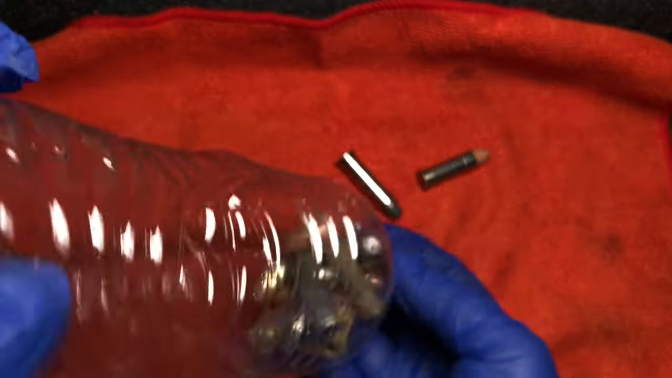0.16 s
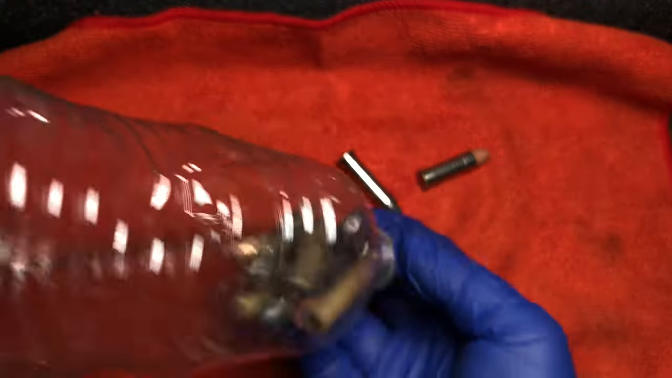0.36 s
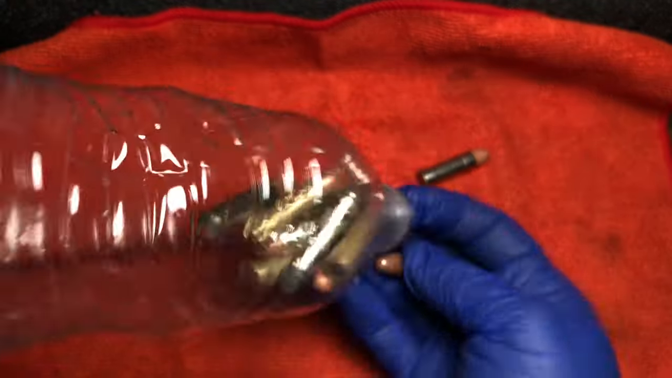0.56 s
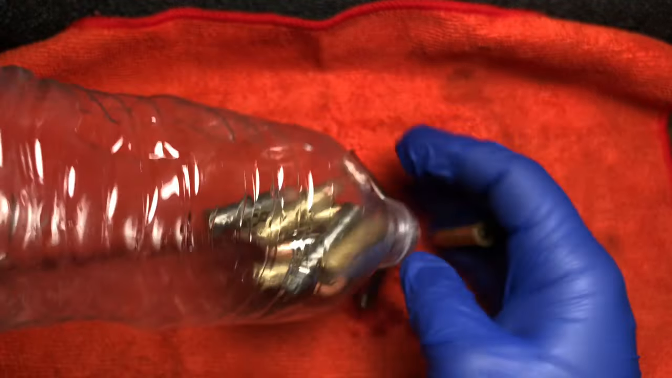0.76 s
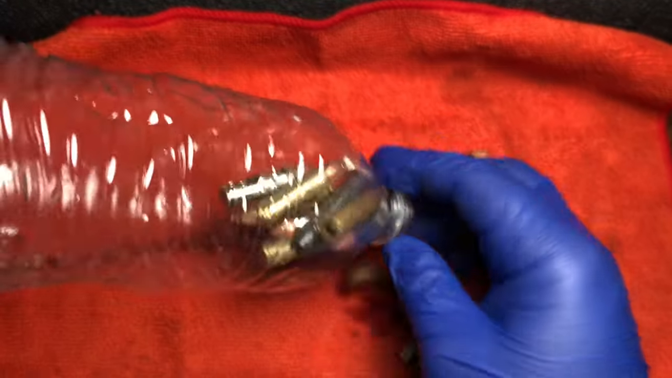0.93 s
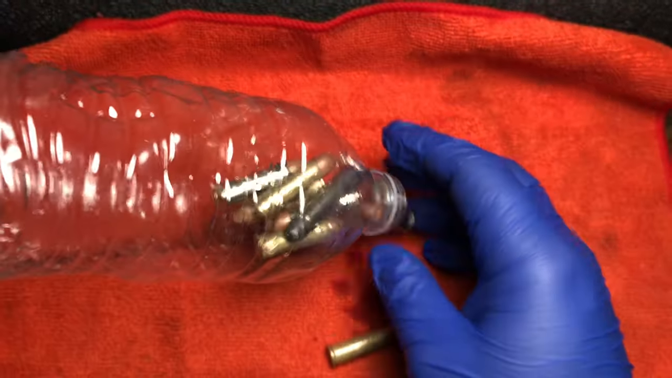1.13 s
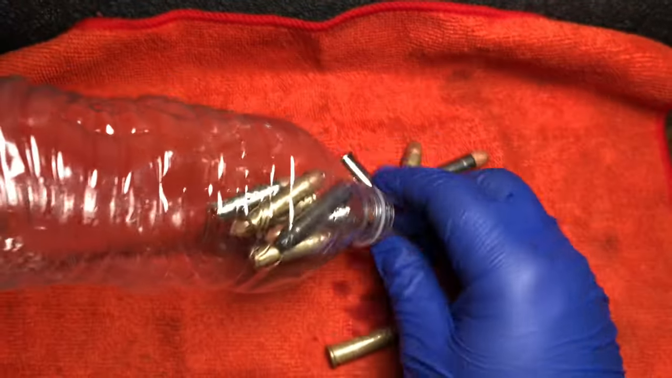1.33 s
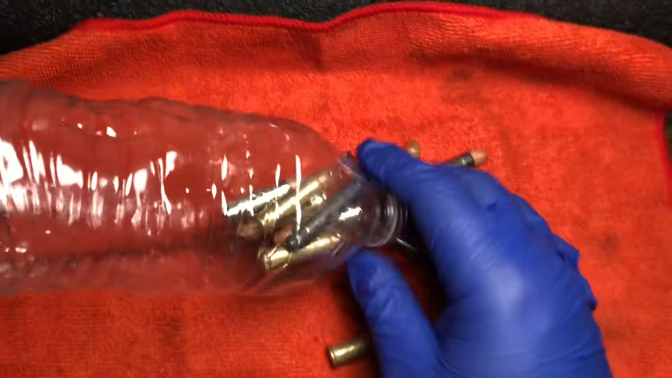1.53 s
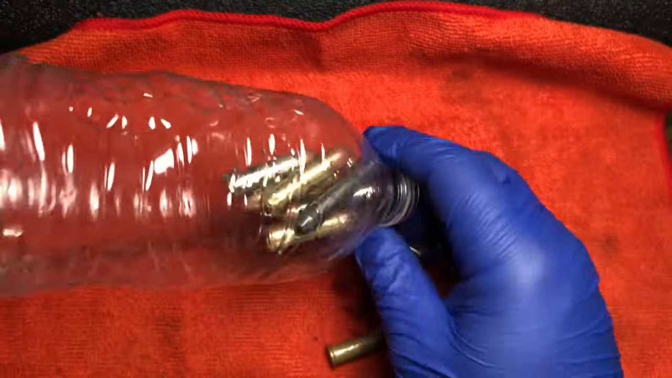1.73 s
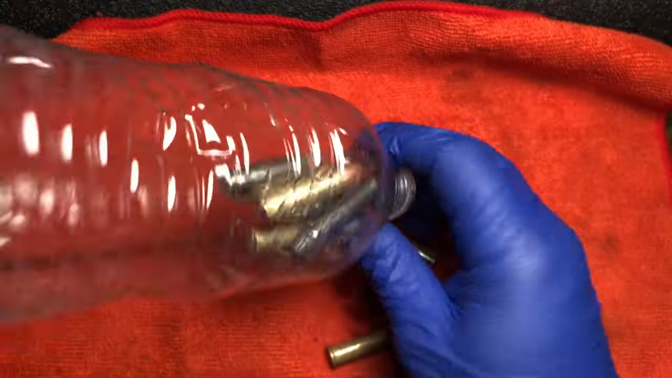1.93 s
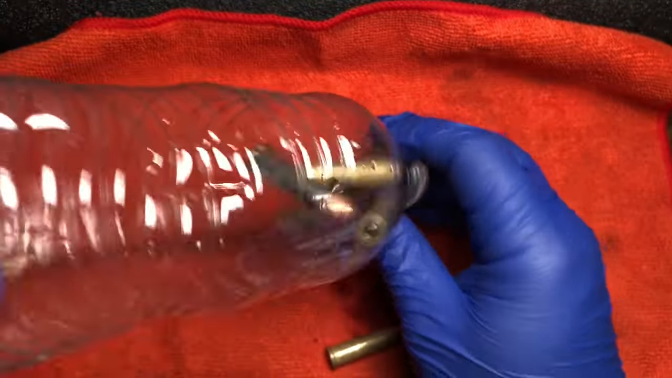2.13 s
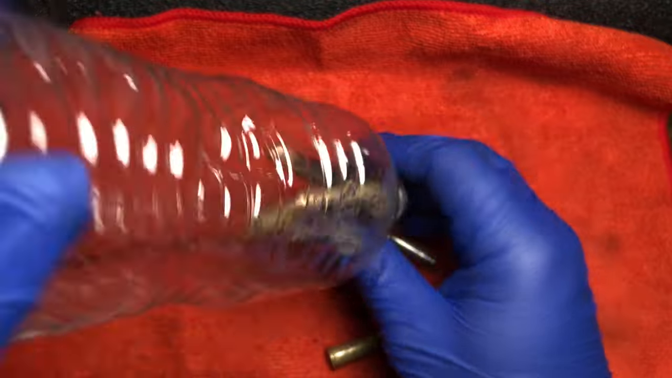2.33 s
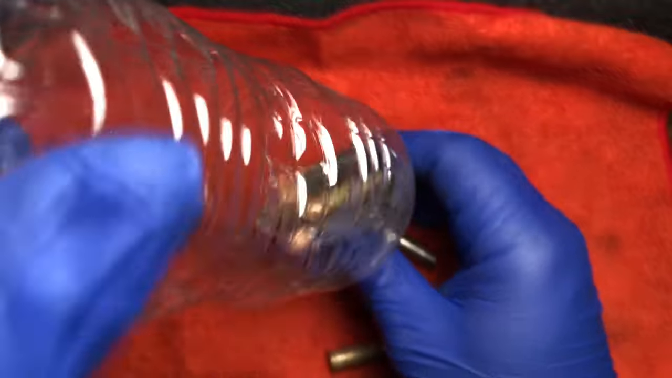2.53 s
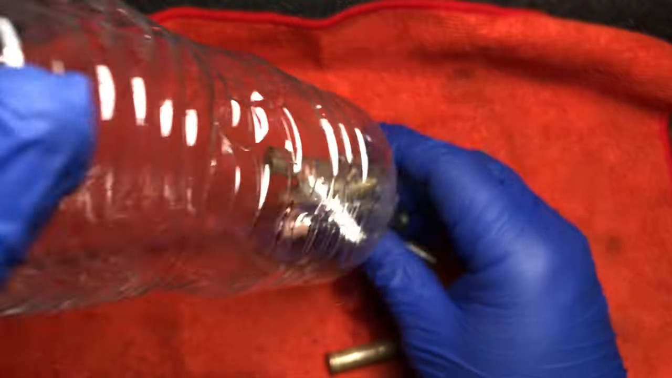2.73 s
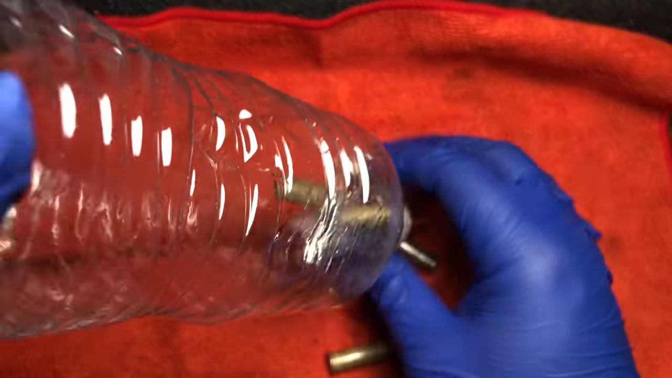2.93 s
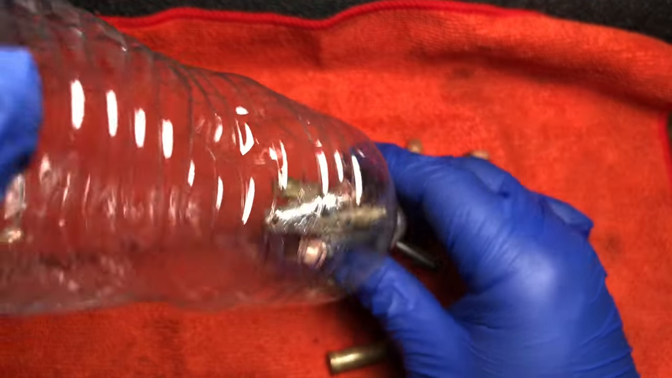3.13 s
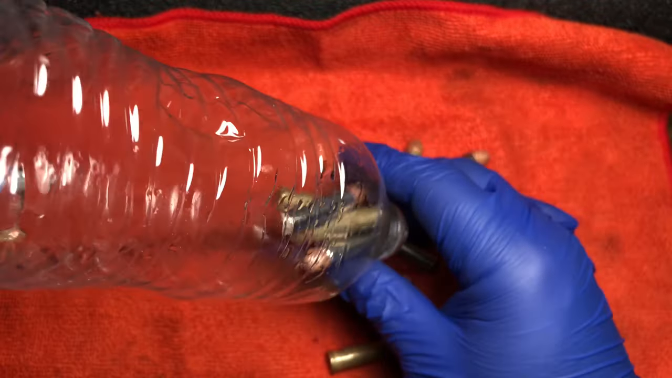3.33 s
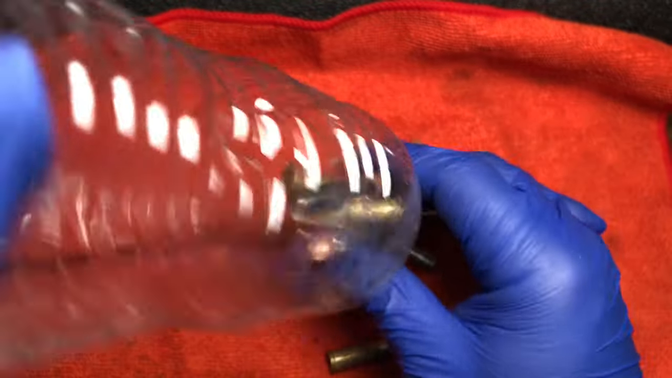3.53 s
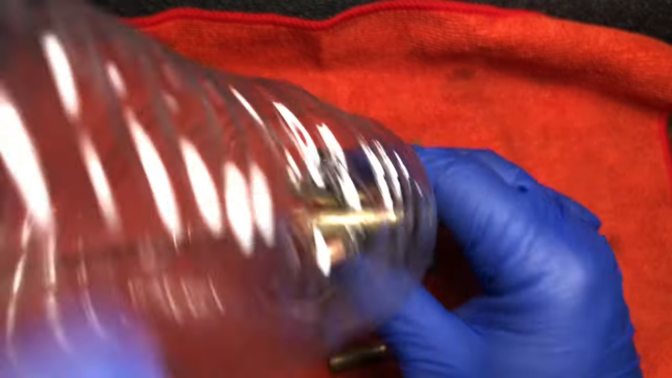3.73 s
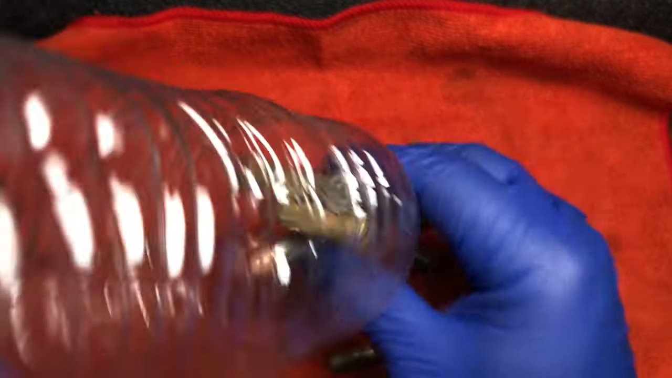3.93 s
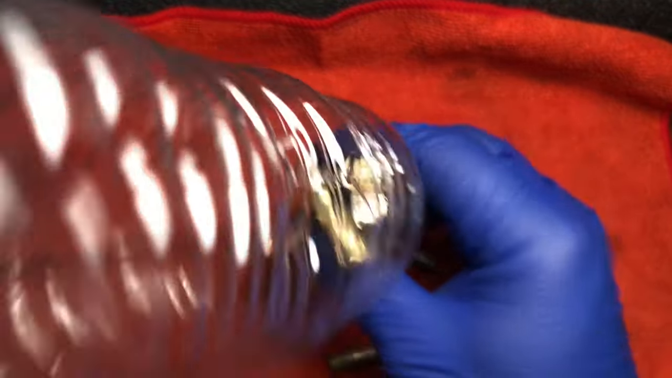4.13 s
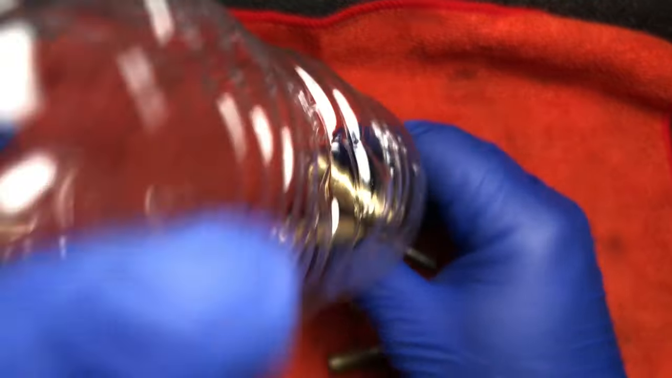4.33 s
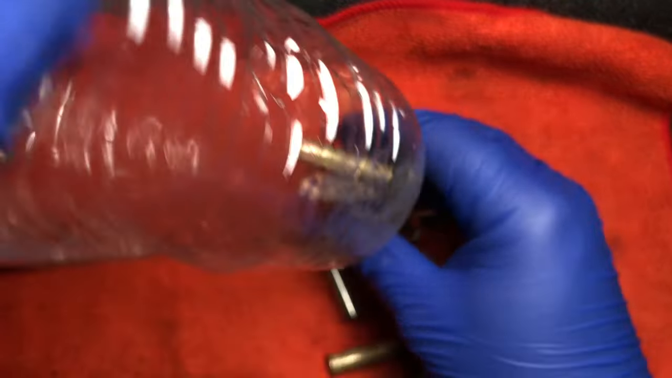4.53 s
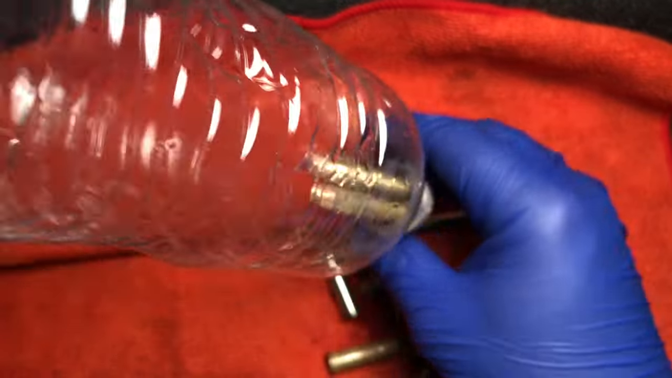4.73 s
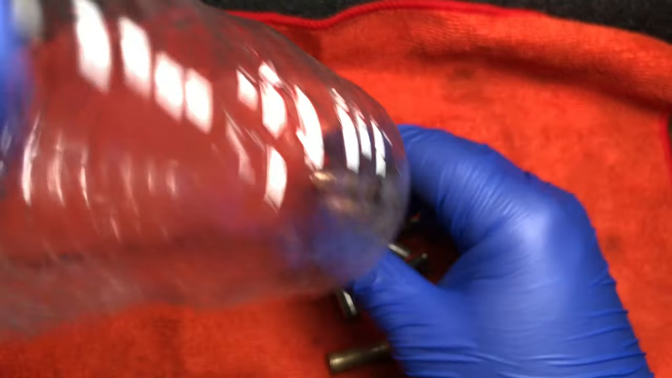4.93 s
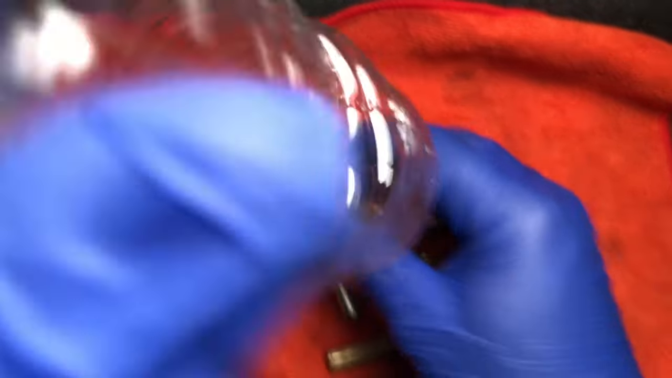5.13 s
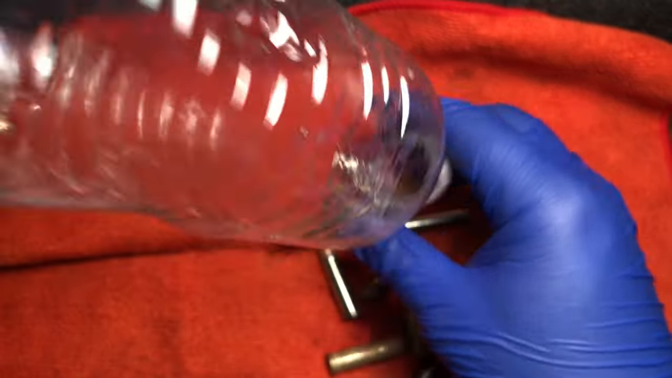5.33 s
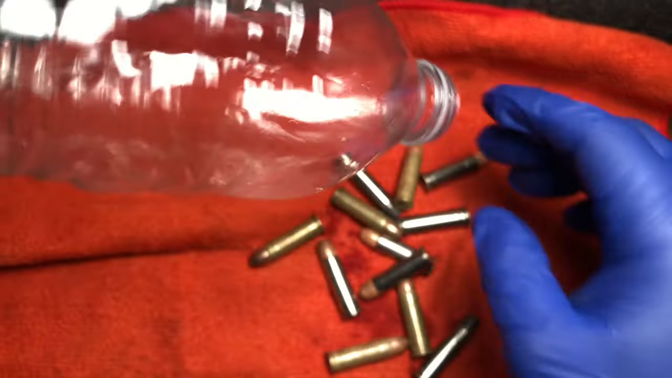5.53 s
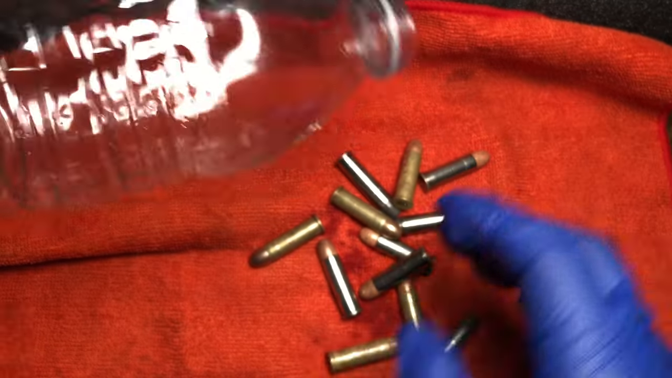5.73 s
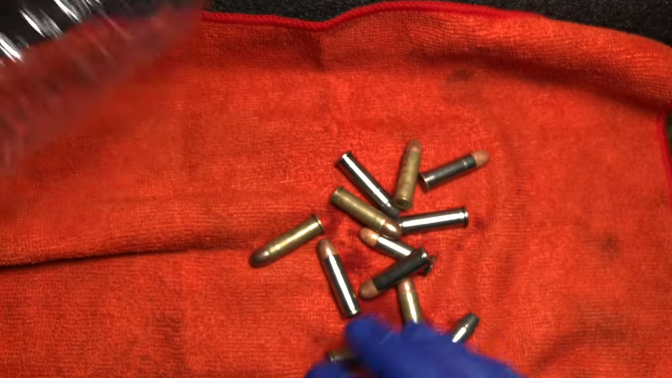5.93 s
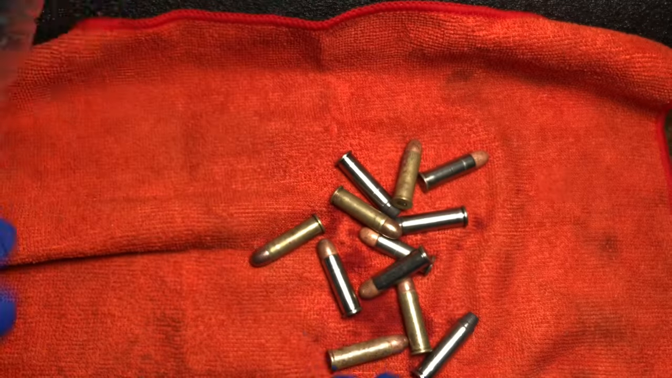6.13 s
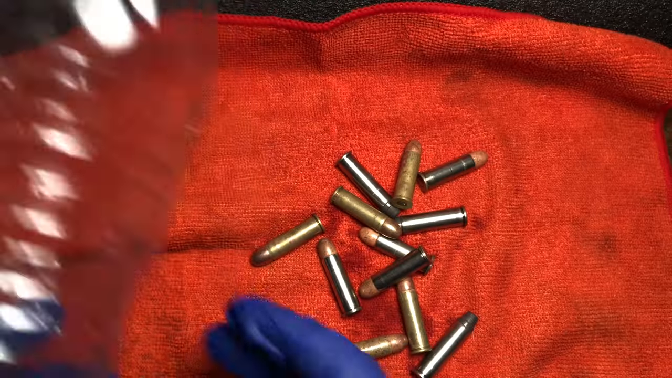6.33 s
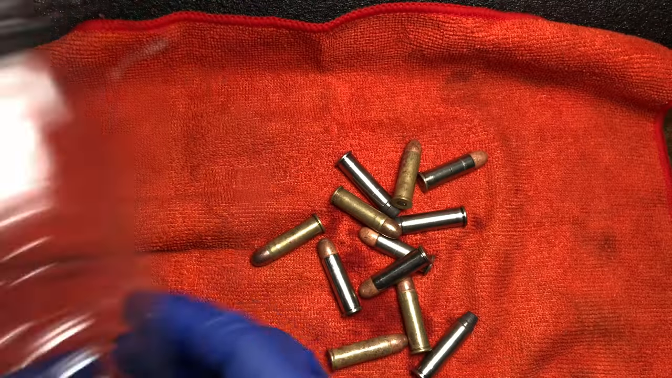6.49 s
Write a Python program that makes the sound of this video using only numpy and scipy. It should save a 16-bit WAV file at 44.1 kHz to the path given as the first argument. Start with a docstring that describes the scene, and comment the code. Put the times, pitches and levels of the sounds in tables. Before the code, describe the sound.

Metal cartridges rattle and clink inside a thin plastic bottle being shaken, with faint glove rustles over a low hum.

```python
"""Over a low appliance hum, loaded brass cartridges clatter in a thin plastic bottle that gloved hands
shake and tip above a cloth-covered table. Each impact cracks and excites the damped modes of the wall
and the hollow body; then the pile rebounds and slides. Colliding cases clink, one high note each.
A small room reverberates, and the gloves rustle by friction on plastic and cloth."""
import sys
import numpy as np
from scipy import signal
from scipy.fft import rfft, irfft
from scipy.io import wavfile
from scipy.ndimage import uniform_filter1d

SR = 44100
rng = np.random.default_rng(int(sys.argv[2]) if len(sys.argv) > 2 else 0)


def unload_wav(signal):
    """Save mono or channel-first audio to the path in sys.argv[1] as 16-bit WAV at rate SR, clipped to [-1, 1]."""
    wavfile.write(
        sys.argv[1],
        SR,
        np.round(np.clip(np.atleast_2d(signal).T, -1, 1) * 32767).astype(np.int16),
    )


N = 289296

# ring mode of each case, lowest first: (frequency [Hz])
CASE_MODES_HZ = [9855, 10090, 10300, 10395, 11070, 11290, 11385, 11770, 11850, 11930]
# decay of each case's mode: (t60 [s])
CASE_DECAYS_S = [0.11, 0.07, 0.055, 0.12, 0.06, .06, 0.07, .05, .055, 0.065]
# when each case drops out of the bottle: (time [s])
CASE_EXITS_S = [1.4, 2.7, 3.2, 2.7, 4.7, 4.7, 4.9, 4.5, 4.5, 4.9]


def undb(db):
    return 10 ** (np.asarray(db) / 20)


def fade(t, t60):
    """Exponential decay, 60 dB down at t60."""
    return np.exp(-np.log(1000) * t / np.maximum(t60, .003))


def colour(x, points):
    """Spectral shaping of the last axis by (frequency [Hz], gain [dB]) points."""
    hz, db = np.transpose(points)
    n = x.shape[-1]
    f = np.maximum(np.arange(n // 2 + 1) * SR / n, 1)
    return irfft(rfft(x) * undb(np.interp(np.log(f), np.log(hz), db)), n)


def place(times, sounds):
    """Superposition of short sounds, each at its time."""
    out = np.zeros(N + sounds.shape[1])
    for s, sound in zip(times, sounds):
        i = int(np.clip(s * SR, 0, N - 1))
        out[i:i + len(sound)] += sound
    return out[:N]


def peak_one(x):
    return x / np.abs(x).max(axis=1, keepdims=True)


def held_noise(samples):
    return np.repeat(rng.standard_normal(N // samples + 1), samples)[:N]


def isolation(times, crowd_s):
    """Near 0 when the next blow follows at once, near 1 when it is far off."""
    ordered = np.append(np.sort(times), N / SR)
    gap = ordered[np.searchsorted(ordered, times, side="right")] - times
    return 1 - np.exp(-(gap / crowd_s) ** 2)


def hum(level_db=-44.5, flicker_db=0.2):
    """Coloured noise: appliance drone and microphone hiss under slight amplitude modulation."""
    # noise spectrum: (frequency [Hz], relative density [dB])
    spectrum = [(18, -73.5), (30, -41), (42, -19.5), (118, -6), (145, -3.5), (233, -5), (266, -16.5),
                (303, -2.5), (328, -17.5), (461, -7.5), (569, -21.5), (684, -16.5), (1010, -27),
                (3870, -45), (16000, -52.5)]
    drone = colour(rng.standard_normal(N), spectrum)
    waver = uniform_filter1d(held_noise(SR // 8), SR // 8)
    return drone / drone.std() * undb(level_db + flicker_db * waver)


def tumble(count=6, fall_db=-6, body_db=-6, crack_db=-3, scatter_db=4.5):
    """Dissipation: random taps weaken as the pile settles. Returns rows of blows for knocks()."""
    # spells of tumbling: (start [s], length [s], opening wall level [dB])
    spells = [(0.0, 0.079, -20.5), (.13, 0.068, -31), (.3, 0.11, -20), (.47, .11, -16.5), (.62, .11, -33),
              (.81, 0.18, -19), (1.08, 0.11, -30.5), (1.19, 0.12, -28.5), (1.54, 0.1, -43),
              (2.05, .08, -37), (2.23, .1, -29), (2.33, 0.12, -13.5), (2.6, 0.049, -39),
              (2.76, 0.058, -19.5), (2.87, 0.067, -26.5), (3.08, 0.078, -31), (3.67, 0.072, -40.5),
              (3.88, 0.052, -13.5), (4.08, .14, -28), (4.29, 0.13, -21), (4.41, 0.18, -31),
              (4.56, 0.097, -31), (4.67, 0.043, -44), (4.94, .11, -33), (5.1, 0.099, -26.5)]
    start, length, opening_db = np.repeat(spells, count, axis=0).T
    progress = (np.tile(np.arange(count), len(spells)) + rng.random(len(start))) / count
    scatter = scatter_db * rng.standard_normal((len(start), 3))
    wall_db = opening_db + fall_db * progress
    levels = wall_db[:, None] + [0, body_db, crack_db] + scatter
    return np.column_stack([start + length * progress, levels])


def bottle_ring(modes, count, size, rise_cycles, scatter_db, detune=0.033, octave_db=0):
    """Modal superposition: the point of impact sets each mode's share; low modes build up later."""
    hz, db, t60 = np.transpose(modes)
    t = np.arange(size) / SR
    partials = []
    for shift in (-1.71, -1.43, 0.0069, 0.67, 1.68):  # the squeezed bottle spreads every mode
        f = (hz * (1 + shift * detune))[:, None]
        rise = 1 - np.exp(-t * f / rise_cycles)
        partials.append(np.sin(2 * np.pi * f * t) * fade(t, t60[:, None]) * rise)
    chance = rng.standard_normal((count, 2, 5 * len(hz)))
    octaves = np.tile(np.log2(hz / hz[0]), 5)
    share_db = np.tile(db, 5) + octave_db * octaves + scatter_db * chance[:, 1]
    share = np.sign(chance[:, 0]) * undb(share_db)
    return peak_one(share @ np.concatenate(partials))


def knocks(times, wall_db, body_db, crack_db, crack_tilt=0.5, wall_tilt=0.16, bump_db=4.0):
    """Impact excitation: a crack, wall and body modes, jingling cases. Longer contact gives less treble."""
    # contact noise: (frequency [Hz], gain [dB])
    crack_spectrum = [(1400, -9.5), (2200, -5.5), (3200, 4.5), (4400, -2.5), (5300, -2.5), (7000, -7.5),
                      (9500, -13.5), (13000, -16), (16000, -30.5)]
    # modes of the plastic wall: (frequency [Hz], relative level [dB], t60 [s])
    wall_modes = [(618.5, -0.5, .04), (708.5, -3, 0.031), (907, -2, 0.051), (959, -11, 0.029),
                  (1075, -0.5, 0.038), (1203.6, 0.5, 0.043), (1349, -4, 0.046), (1466, -4, 0.034),
                  (1632, -3.5, 0.027), (1947, -5.5, 0.026), (2117, -5.5, 0.028), (2660, -6, 0.026),
                  (2970, -6, 0.016)]
    # modes of the hollow body: (frequency [Hz], relative level [dB], t60 [s])
    body_modes = [(157.9, -4.5, 0.057), (220.7, -5, 0.07), (253.5, -2.5, 0.097), (313.5, -2.5, 0.077),
                  (344, -7, 0.063), (417.4, -5, 0.076), (518.3, -5, 0.056)]
    count = len(times)
    t = np.arange(1024) / SR
    noise = colour(rng.standard_normal((count, len(t))), crack_spectrum)
    softness = np.clip(wall_db - crack_db, -8, 30)[:, None]  # a soft, long contact cracks weakly
    octaves = np.log2(np.maximum(np.arange(len(t) // 2 + 1) * SR / len(t), 1000) / 3000)
    spot_colour = np.repeat(rng.standard_normal((count, 27)), 19, axis=1)
    bumps = bump_db * uniform_filter1d(spot_colour, size=12)
    noise = irfft(rfft(noise) * undb(bumps - crack_tilt * softness * octaves))
    bursts = peak_one(noise * fade(t, t60=0.018) * np.minimum(t / 0.0012, 1))
    crack = place(times, bursts * undb(crack_db)[:, None])
    wall_rings = bottle_ring(wall_modes, count, size=3072, rise_cycles=1.2, scatter_db=4.5,
                             octave_db=-wall_tilt * softness)
    body_rings = bottle_ring(body_modes, count, size=5120, rise_cycles=0.91, scatter_db=5)
    wall = place(times, wall_rings * undb(wall_db)[:, None])
    body = place(times, body_rings * undb(body_db)[:, None])
    return crack + jingle(crack) + wall + body


def jingle(crack, gain_db=-39, scatter_db=6, shuffle_s=0.017):
    """Resonance: the cracks drive the cases still inside, now one, now another, as the pile shuffles."""
    t = np.arange(3072) / SR
    out = 0
    for hz, t60, exit_s in zip(CASE_MODES_HZ, CASE_DECAYS_S, CASE_EXITS_S):
        shuffle = np.repeat(rng.standard_normal(N // 200), int(shuffle_s * SR))[:N]
        drive = crack * undb(scatter_db * shuffle) * (np.arange(N) < exit_s * SR)
        out = out + signal.oaconvolve(drive, np.sin(2 * np.pi * hz * t) * fade(t, t60))[:N]
    return undb(gain_db) * out


def rebounds(blows, count=4, within_s=.02, loss_db=-8, body_loss_db=-6, lone_db=-14):
    """Inelastic collisions: weaker taps around each blow as neighbours land, faint after a lone one."""
    times, wall_db, body_db, crack_db = np.repeat(blows, count, axis=0).T
    chance = rng.random((len(times), 2))
    alone = np.repeat(isolation(blows[:, 0], crowd_s=0.04), count)
    loss = loss_db + 4 * np.log(chance[:, 1] + 1e-3) + lone_db * alone
    landings = times - .003 + within_s * chance[:, 0]
    return knocks(landings, wall_db + loss, body_db + loss + body_loss_db, crack_db + loss)


def slide(blows, gain_db=-10.5, rise_s=0.002, grain_db=3, lone_db=-14, per_case_db=2.9):
    """Sliding friction: the pile scrapes the ribbed wall after each blow, quieter as cases leave."""
    times, _, _, crack_db = blows.T
    cases_gone = np.searchsorted(np.sort(CASE_EXITS_S), times)
    level_db = crack_db + lone_db * isolation(times, crowd_s=.045) - per_case_db * cases_gone
    t = np.arange(8192) / SR
    envelope = fade(t, t60=0.08) * (1 - np.exp(-t / rise_s))
    power = place(times, (undb(level_db)[:, None] * envelope) ** 2)  # incoherent sounds add in power
    grain = undb(grain_db * held_noise(64))
    scrape = colour(grain * rng.standard_normal(N),
                    [(500, -19), (1100, 1.5), (2800, -4), (5000, -7.5), (9000, -14.5), (16000, -18.5)])
    return undb(gain_db) * np.sqrt(power) * scrape / scrape.std()


def room(dry, rise_s=0.001, spots=4, move_s=.07):
    """Reverberation: a diffuse tail, shorter in the treble, whose colour shifts as the bottle moves."""
    # bands of the tail: (centre [Hz], gain [dB], t60 [s])
    bands = [(189, -6.5, 0.32), (488, -7, 0.26), (1152, -11, 0.31), (2440, -10, 0.29), (6275, -12.5, 0.28),
             (12000, -16.5, 0.21)]
    t = np.arange(15000) / SR
    tails = 0
    for hz, db, t60 in bands:
        passband = [(hz / 2.5, -40), (hz / 1.5, 0), (hz * 1.5, 0), (hz * 2.5, -40)]
        noise = colour(rng.standard_normal((spots, len(t))), passband)
        tails = tails + undb(db) * noise * fade(t, t60) * np.sqrt(14 / t60 / SR)
    tails = tails * (1 - np.exp(-t / rise_s))
    spot = (np.arange(N) / (move_s * SR)).astype(int) % spots
    return sum(signal.oaconvolve(dry * (spot == k), tail)[:N] for k, tail in enumerate(tails))


def clinks(split_hz=35, twin_gain=0.32, jostle_db=6, tick_gain=0.32, spread_hz=40):
    """Beating: a struck case ticks, then its mode beats with a close twin, jostled by its neighbours."""
    # case against case: (time [s], case [letter, "a" lowest], level [dB])
    collisions = [(0.01, "c", -31.5), (0.048, "e", -26), (0.049, "c", -11), (0.17, "c", -35.5),
                  (0.223, "e", -23), (0.2224, "g", -31.5), (0.2359, "d", -13), (0.277, "j", -29.5),
                  (0.308, "h", -34.5), (0.322, "b", -31), (0.3681, "j", -26), (0.392, "i", -17),
                  (0.4194, "b", -16.5), (0.4199, "d", -17), (0.454, "i", -18.5), (0.455, "b", -14.5),
                  (0.48, "g", -23), (0.5202, "b", -21), (0.52, "h", -23.5), (0.614, "e", -21),
                  (0.613, "i", -11), (0.8247, "d", -24.5), (0.955, "j", -41), (1.1089, "c", -40),
                  (1.1469, "a", -13), (1.1089, "f", -30), (1.2034, "f", -24.5), (1.9976, "c", -26.5),
                  (2.0118, "g", -15), (2.1984, "d", -22), (2.197, "j", -19), (2.3341, "i", -27),
                  (2.377, "f", -26.5), (2.3775, "j", -23), (2.5227, "g", -25.5), (2.5474, "j", -24.5),
                  (2.5626, "d", -19), (2.5636, "f", -17.5), (2.604, "b", -22), (2.6743, "g", -29),
                  (2.6973, "g", -31), (2.6973, "h", -20), (2.7337, "g", -20), (2.7563, "g", -19),
                  (2.979, "c", -20), (3.0036, "e", -22), (3.11, "c", -37), (3.751, "f", -27),
                  (3.876, "g", -24), (3.904, "e", -21), (3.92, "g", -20), (3.9865, "f", -25.5),
                  (4.0692, "g", -20), (4.135, "i", -22), (4.161, "g", -20), (4.2673, "g", -16),
                  (4.2677, "h", -20), (4.347, "h", -32), (4.414, "i", -37), (4.444, "f", -27),
                  (4.496, "g", -26), (4.536, "j", -20.5), (4.6129, "e", -26), (4.665, "e", -26),
                  (4.665, "g", -21), (4.6877, "g", -27), (4.686, "j", -31), (4.789, "f", -37.5),
                  (4.9816, "j", -40), (5.1095, "d", -17), (5.1535, "d", -21.5)]
    times, letters, db = map(np.array, zip(*collisions))
    case = np.array(["abcdefghij".index(letter) for letter in letters])
    chance = rng.standard_normal((len(times), 62))
    hz = np.array(CASE_MODES_HZ)[case, None] + spread_hz * chance[:, :1]
    t60 = np.array(CASE_DECAYS_S)[case, None]
    t = np.arange(7200) / SR
    twin = np.sin(2 * np.pi * (hz + split_hz) * t + np.pi * chance[:, 1:2])
    note = (np.sin(2 * np.pi * hz * t) + twin_gain * twin) * fade(t, t60)
    jostle = uniform_filter1d(np.repeat(chance[:, 2:], len(t) // 60, axis=1), size=100)
    tick = np.diff(rng.standard_normal((len(times), len(t))) * fade(t, t60=.005), prepend=0)
    return place(times, undb(db)[:, None] * (note * undb(jostle_db * jostle) + tick_gain * tick))


def glove_rustle(grain_db=2.5, grain_s=.002, edge_db=-11):
    """Friction noise: gloves rub plastic and cloth in grainy swells with a bright and a dull part."""
    # rubs: (peak time [s], rise [s], fall [s], bright level [dB], dull over bright [dB])
    rubs = [(1.359, 0.016, 0.17, -62, -12), (1.64, 0.18, 0.056, -70.5, 18), (1.864, 0.027, 0.019, -61, 13),
            (1.9, .05, .15, -65.5, 0), (2.89, 0.037, 0.053, -58, 8), (3.2, 0.022, 0.17, -73, 18.5),
            (3.445, 0.023, 0.028, -52, 0), (3.529, 0.027, 0.072, -64, -1), (3.754, .006, 0.009, -45, 11),
            (3.68, 0.087, .06, -56, 5), (3.808, 0.02, 0.025, -53, 5), (4.85, 0.1, .05, -60, 3),
            (4.97, 0.12, 0.036, -57, 3), (4.998, 0.0043, 0.013, -36.5, 8.5), (5.05, 0.013, 0.0086, -49, 0),
            (5.2, .02, 0.092, -61.5, 25), (5.336, 0.016, 0.043, -62, -7), (5.43, 0.0085, 0.1, -69.5, 30.5),
            (5.84, .03, 0.044, -66.5, 3), (5.934, .06, 0.17, -70, 1), (6.147, 0.032, 0.016, -55, 1),
            (6.33, 0.13, .14, -61, -10), (6.479, 0.013, 0.13, -51, 0), (6.56, .015, .02, -51, -4)]
    t = np.arange(N) / SR
    grain = undb(grain_db * held_noise(int(grain_s * SR)))
    bright = colour(grain * rng.standard_normal(N),
                    [(1500, -14), (3500, 1), (6000, -1), (10000, -7), (16000, -10.5)])
    dull = colour(grain * rng.standard_normal(N),
                  [(250, -17), (600, -4), (1300, 2), (2600, -6.5), (5000, -37)])
    out = 0
    for peak_s, rise_s, fall_s, db, dull_db in rubs:
        from_peak = np.where(t < peak_s, (peak_s - t) / rise_s, (t - peak_s) / fall_s)
        swell = undb(db + edge_db * from_peak ** 1.7)
        out = out + swell * (bright / bright.std() + undb(dull_db) * dull / dull.std())
    return out


def scene():
    """Superposition of direct sound, reverberation and hum in one channel."""
    # prominent blows: (time [s], wall level [dB], body level [dB], crack level [dB])
    main_blows = [(0.0129, -23, -27.5, -18), (0.0392, 0, -11, 1.5), (0.0507, -10.5, -13, -0.5),
                  (0.0676, -12, -12, -12), (0.0767, -6.5, -20.5, -6), (0.134, -14, -34, -17),
                  (0.1683, -25.5, -24, -17.5), (0.2012, -13.5, -29.5, -19), (0.2114, -7, -15.5, -9.5),
                  (0.2199, -4, -13.5, 0.5), (0.232, -1, -6.5, -8), (0.2447, 0, -16, -25),
                  (0.257, -20.5, -13, -4), (0.2844, -13, -18.5, -8), (0.366, -15.5, -38.5, -11),
                  (0.3849, -7, -14, -7.5), (0.397, -13, -11, -6.5), (0.4063, -3, -13.5, -5),
                  (0.4166, -8, -15.5, -3.5), (0.4351, -4, -22.5, -4), (0.456, -6.5, -21, -10),
                  (0.5136, -9, -32, -15), (0.59, -16, -16.5, -14.5), (0.598, -13, -25.5, -9.5),
                  (0.6072, -10, -23, -11), (0.6206, -6.5, -11, -2.5), (0.6775, -10.5, -16.5, -9),
                  (0.7443, -17, -34, -14), (0.7596, -13.5, -19, -15), (0.8224, -24.5, -28, -19),
                  (0.838, -16.5, -9, -14.5), (0.8569, -1.5, -11, -12.5), (0.9007, -17, -27, -23.5),
                  (0.943, -33, -29, -32), (1.0081, -6.5, -16.5, -15.5), (1.0404, -15, -29, -24.5),
                  (1.079, -8.5, -26, -7), (1.1473, -20.5, -17.5, -19.5), (1.213, -39, -20.5, -37),
                  (1.334, -17, -26.5, -18), (1.5037, -17, -16.5, -41), (1.6086, -36, -54, -36.5),
                  (1.6573, -24.5, -35.5, -28), (1.7632, -15.5, -24.5, -22.5), (1.859, -27, -35.5, -30),
                  (1.991, -19, -33, -18), (1.9985, -13, -16.5, -12.5), (2.0123, -12, -6.5, -11),
                  (2.023, 0, -11, -7), (2.036, -10.5, -3, -4), (2.0676, -20.5, -18, -16.5),
                  (2.0975, -12.5, -33, -17.5), (2.16, -16.5, -26, -19.5), (2.1773, -5, -44, -5),
                  (2.19, -7, -5.5, -11), (2.1989, -3, -6, -6), (2.2179, -3, -3.5, -5.5),
                  (2.2474, -16.5, -29, -15.5), (2.302, -2.5, -16.5, -4), (2.3592, -15.5, -11.5, -12),
                  (2.3716, -22.5, -38, -12.5), (2.3792, -3, -8.5, -4), (2.393, -12.5, -14.5, -11),
                  (2.487, -24.5, -19, -25), (2.503, -13.5, -18, -13), (2.5281, -10, -13.5, -9.5),
                  (2.5467, -6, -9, -5.5), (2.5643, -2.5, 0.5, -11), (2.571, -17.5, -11, -3.5),
                  (2.591, -6, -13, -7.5), (2.6189, -19.5, -28, -8), (2.6736, -17, -43, -21.5),
                  (2.6971, -14.5, -30, -16), (2.7332, -11, -18.5, -5), (2.756, -5.5, -19.5, -13.5),
                  (2.773, -34, -16.5, -13.5), (2.8139, -23.5, -41, -28), (2.8638, -17.5, -40, -20),
                  (2.9087, -19, -51, -26.5), (2.9327, -24, -48, -32.5), (2.9737, -23.5, -33, -26),
                  (3.0039, -33, -26, -27.5), (3.0561, -38, -35, -29.5), (3.0912, -23.5, -30, -29),
                  (3.1166, -20.5, -27.5, -57), (3.1441, -30.5, -43, -47), (3.3762, -34, -43, -39),
                  (3.404, -35, -58, -55), (3.4934, -28.5, -44, -38.5), (3.588, -41, -48, -44),
                  (3.673, -35, -36, -31), (3.714, -25, -29, -34), (3.754, -17, -29, -24.5),
                  (3.8622, -13, -30, -14.5), (3.8727, -4, -10, -9.5), (3.8826, -20, -20, -16),
                  (3.8987, -4.5, -1, -13), (3.906, -13, -11, -7.5), (3.9206, -45, -22, -12.5),
                  (4.0519, -14, -17, -13), (4.0725, -1.5, -9, -6), (4.0807, -1, 1.5, -5.5),
                  (4.1167, -5.5, -34, -3.5), (4.1288, -37, -9, -4.5), (4.1396, -4.5, -19, -26),
                  (4.1516, -24, -33, -8.5), (4.1807, -20.5, -31, -27), (4.242, -19, -13, -19.5),
                  (4.2544, -7.5, -17, -6), (4.2767, -5, -10.5, -4.5), (4.288, -10.5, -6.5, -8.5),
                  (4.3446, -23, -41, -16.5), (4.3752, -14, -27, -33), (4.407, -15, -16, -15),
                  (4.4315, -9, -8, -6), (4.4502, -5, -16, -4.5), (4.4673, -15, -17, -8),
                  (4.4794, -18, -11.5, -16), (4.4941, -9.5, -32, -8), (4.5371, -24, -27, -19),
                  (4.5516, -17.5, -42, -16.5), (4.6042, -23, -22.5, -20.5), (4.667, -38, -28, -23),
                  (4.6877, -28.5, -33.5, -21.5), (4.7616, -30, -35, -29), (4.796, -28, -31, -28.5),
                  (4.8956, -18.5, -29.5, -20.5), (4.939, -26.5, -29, -26.5), (4.9987, -13.5, -28, -16),
                  (5.0632, -13, -18.5, -8), (5.098, -7.5, -15, -20), (5.1222, -13, -18.5, -8.5),
                  (5.141, -9, -23, -15.5), (5.153, -16, -18, -12.5), (5.179, -22, -46, -28),
                  (5.421, -9.5, -13.5, -28.5)]
    # strength of the reverberant tail as the bottle empties: (time [s], gain [dB])
    tail_gains = [(0, 1), (1.4, 0.5), (3, 2), (4.9, -0.5), (5.08, 0), (6.56, -3)]
    blows = np.concatenate([main_blows, tumble()])
    direct = knocks(*blows.T) + rebounds(blows) + slide(blows) + clinks() + glove_rustle()
    tail_db = np.interp(np.arange(N) / SR, *np.transpose(tail_gains))
    return (direct + room(direct * undb(tail_db)) + hum())[None]


def record(dry):
    """Band limiting and saturation: the microphone thins the bass, rounds peaks and cuts the top."""
    bass_cut = signal.butter(2, 60, "high", fs=SR, output="sos")
    top_cut = signal.ellip(10, .2, 80, 15800, fs=SR, output="sos")
    rounded = np.tanh(1.013 * signal.sosfilt(bass_cut, dry)) / 1.25
    return signal.sosfilt(top_cut, rounded)


dry = scene()
out = record(dry)
unload_wav(out)
```